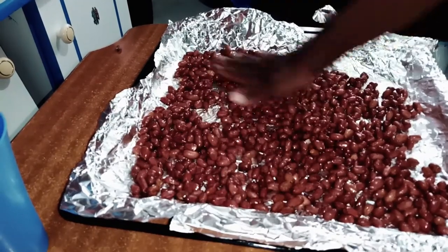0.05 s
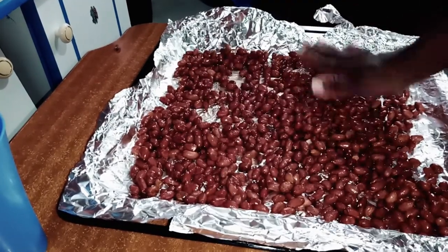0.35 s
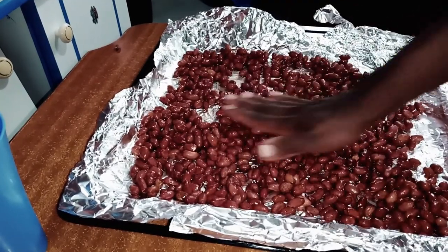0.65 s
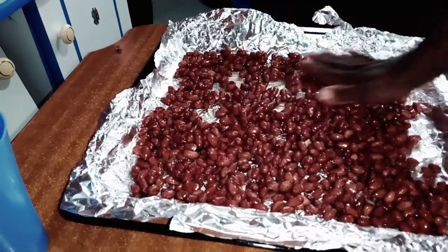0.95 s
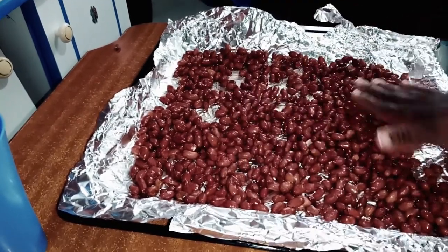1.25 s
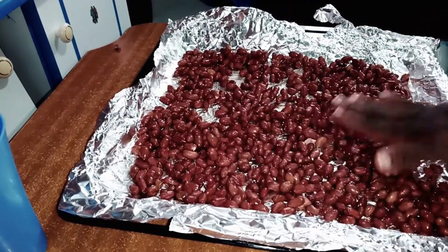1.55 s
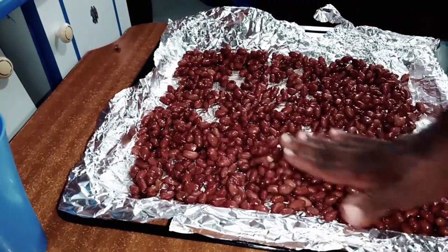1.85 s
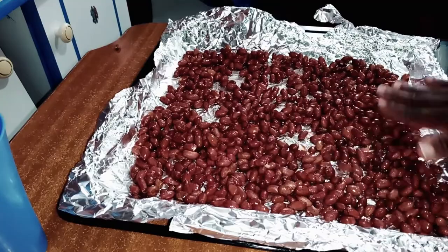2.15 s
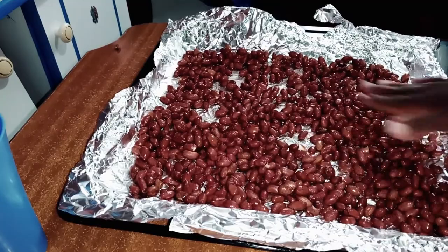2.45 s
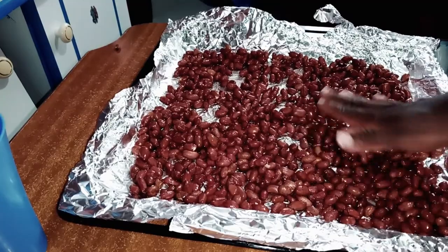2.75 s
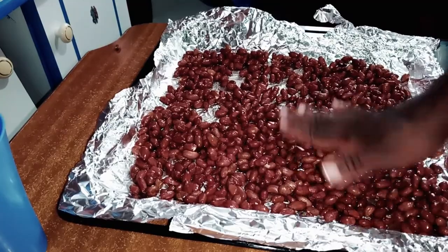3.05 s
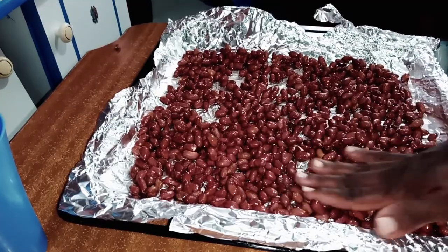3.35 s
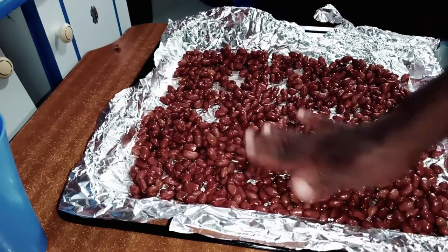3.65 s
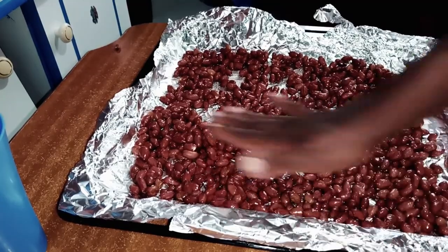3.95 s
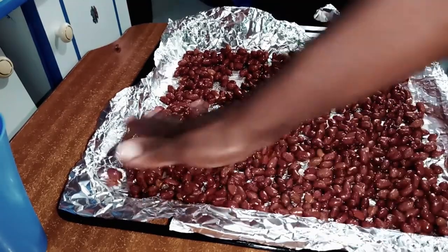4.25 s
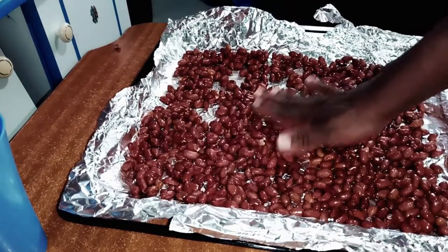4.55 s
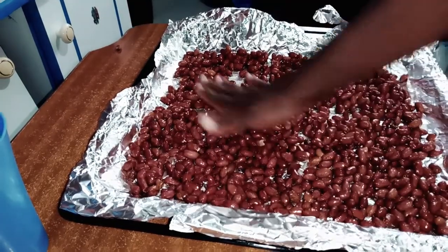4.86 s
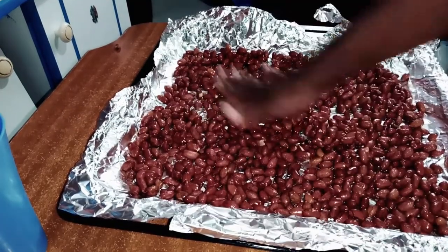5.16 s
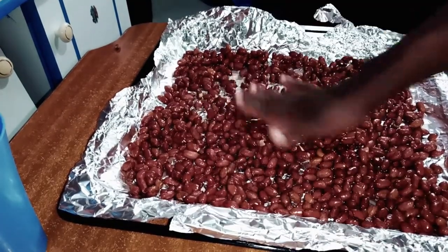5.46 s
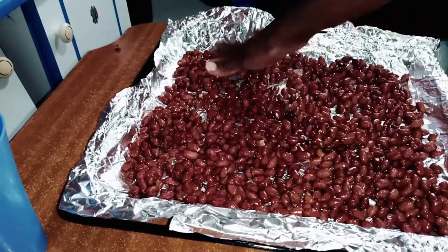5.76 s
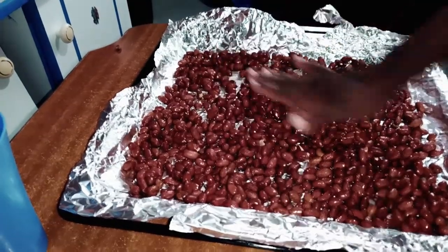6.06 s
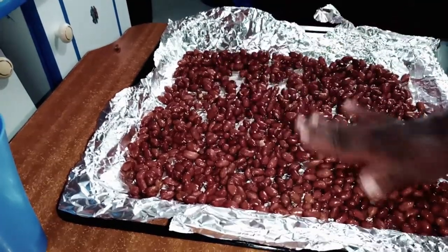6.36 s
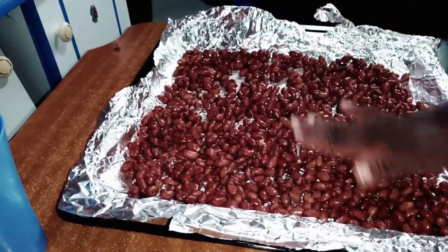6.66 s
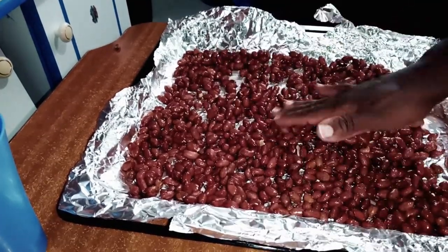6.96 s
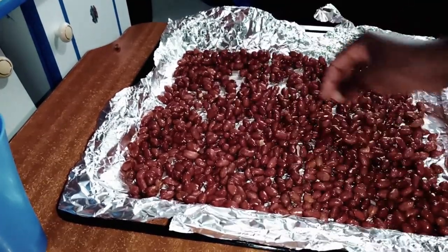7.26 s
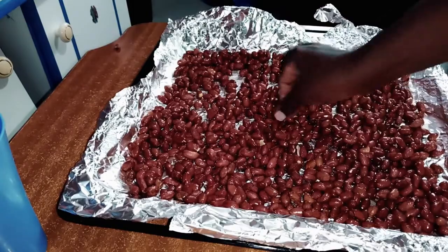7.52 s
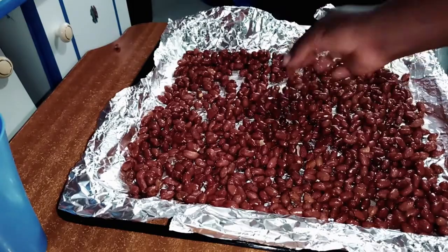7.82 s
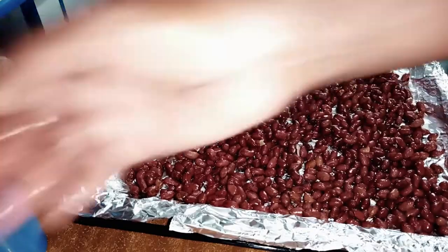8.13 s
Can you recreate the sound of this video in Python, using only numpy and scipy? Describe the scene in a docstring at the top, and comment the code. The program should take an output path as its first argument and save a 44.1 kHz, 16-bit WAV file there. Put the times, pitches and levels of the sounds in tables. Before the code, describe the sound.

Close, repeated rustles of foil and clattering nuts as a hand spreads them over a baking tray in a quiet kitchen.

```python
"""Spreading peanuts on foil

A small kitchen, one microphone close to a foil-lined baking tray. A hand pats and spreads raw peanuts.
Each stroke swells, slides and lets go in a shower of tiny contacts: the foil crinkles, nuts click
together, the tray rumbles under them and flexes under the palm. Single creases snap and single nuts
knock on the tray. Behind it are faint hisses, still air and a low, wavering hum."""
import sys
import numpy as np
from scipy import signal
from scipy.fft import rfft, irfft
from scipy.io import wavfile
from scipy.ndimage import uniform_filter1d

SR = 44100
rng = np.random.default_rng(int(sys.argv[2]) if len(sys.argv) > 2 else 0)


def digitize_waveform(pressure):
    """Quantize a signal to 16-bit integers and store it at the path in sys.argv[1].

    Rows of a 2-D input are taken as channels; values are limited to [-1, 1].
    """
    field = np.atleast_2d(pressure).T
    bounded = np.clip(field, -1, 1)
    quanta = np.round(bounded * 32767).astype(np.int16)
    wavfile.write(sys.argv[1], SR, quanta)


N = 361179


def from_db(db):
    """Decibels to gain."""
    return 10 ** (np.asarray(db) / 20)


def rms_one(x):
    """Scale to rms 1."""
    return x / np.sqrt(np.mean(x ** 2) + 1e-20)


def in_time(rows):
    """Each column of a curve at every sample."""
    times, *columns = np.transpose(rows)
    return [np.interp(np.arange(N) / SR, times, column) for column in columns]


def add(out, start_s, sound):
    """Mix a short sound in at start_s."""
    at = int(np.clip(start_s * SR, 0, N - 1))
    out[at:at + len(sound)] += sound[:N - at]


def convolve(x, response):
    """Pass x through an impulse response."""
    return signal.oaconvolve(x, response)[:len(x)]


def response_of(spectrum, size=4096):
    """The causal (minimum-phase) impulse response that has this spectrum; energy 1."""
    hz, db = np.transpose(spectrum)
    grid_hz = np.maximum(np.fft.rfftfreq(size, 1 / SR), 1)
    gain = from_db(np.interp(np.log(grid_hz), np.log(hz), db))
    cepstrum = irfft(np.log(gain))
    cepstrum[1:size // 2] *= 2
    cepstrum[size // 2 + 1:] = 0
    return rms_one(irfft(np.exp(rfft(cepstrum)))) / np.sqrt(size)


def burst(t60, size=4096):
    """Noise that dies away by 60 dB in t60 seconds; energy 1."""
    decay = from_db(-60 * np.arange(size) / SR / t60)
    return rms_one(rng.standard_normal(size) * decay) / np.sqrt(size)


def band(x, hz, ratio):
    """Band-pass from hz / ratio to hz * ratio."""
    edges = [hz / ratio, hz * ratio]
    return signal.sosfilt(signal.butter(2, edges, "band", fs=SR, output="sos"), x)


def drift(per_s):
    """A random wander with per_s turning points a second; rms 1."""
    knots = rng.standard_normal(N // 20)
    return rms_one(np.interp(np.arange(N) / SR * per_s, np.arange(len(knots)), knots))


def brighten(x, pivot_hz, bright_db):
    """Raise or lower everything above the pivot."""
    low = signal.sosfiltfilt(signal.butter(3, pivot_hz, fs=SR, output="sos"), x)
    return low + from_db(bright_db) * (x - low)


def steady(x):
    """Hold the level at 1, leaving the fine grain."""
    x = rms_one(x)
    power = uniform_filter1d(uniform_filter1d(x ** 2, size=900), size=600)
    return x / np.sqrt(np.maximum(power, 1e-9))


# Room tone of the kitchen: frequency_hz, density_db
AIR_SPECTRUM = [(25, -7.5), (65, 4), (130, -7), (260, -11.5), (430, -19), (900, -21.5), (3300, -25),
                (5200, -24), (6400, -19), (8600, -35), (13500, -29.5), (15000, -25), (16000, -34.5)]


def still_air(level_db=-73):
    """Steady, soft noise all around the microphone, strongest in the bass."""
    return from_db(level_db) * rms_one(convolve(rng.standard_normal(N), response_of(AIR_SPECTRUM)))


# Course of the hum in the background: time_s, pitch_hz, relative_level_db
HUM_CURVE = [(0.0, 71, -73), (0.04, 69.4, -66), (0.41, 66.7, -65.5), (0.7, 67, -77), (1.03, 77.6, -60),
             (1.3, 79.0, -84), (1.43, 82, -58), (1.64, 81.3, -72), (1.78, 67.65, -77), (1.87, 63.1, -58),
             (2.0, 58.45, -69), (3.17, 76.7, -63.5), (3.37, 76.8, -79), (3.49, 81.6, -65.5),
             (3.9, 85.7, -68.5), (4.22, 69.55, -62), (5.31, 69.69, -67), (5.7, 52.5, -65),
             (6.09, 62.25, -82.5), (6.34, 62.7, -73), (6.61, 57.8, -67), (6.93, 62.8, -78.5),
             (7.25, 60.4, -73), (7.53, 66.5, -80.5), (8.1, 66.3, -68), (8.19, 64.9, -61.5)]


def hum(waver_hz=4.0, waver_db=3.0, trim_db=-0.9):
    """A low tone that wavers in pitch and strength."""
    hz, db = in_time(HUM_CURVE)
    phase = 2 * np.pi * np.cumsum(hz + waver_hz * drift(40)) / SR
    return from_db(db + trim_db + waver_db * drift(16)) * rms_one(np.sin(phase))


# Thin hisses between strokes: centre_s, length_s, pitch_hz, level_db
HISSES = [(4.275, 0.029, 5600, -54), (4.608, .025, 4500, -57), (6.05, .04, 5140, -68),
          (7.172, 0.13, 4910, -71), (7.386, .09, 6410, -68), (7.992, 0.079, 6030, -69.5)]


def hisses(flutter_db=2.5):
    """Faint, narrow bands of noise swell, flutter and fade."""
    out = np.zeros(N)
    for centre_s, length_s, hz, db in HISSES:
        swell = np.hanning(int(length_s * SR))
        hiss = rms_one(band(rng.standard_normal(SR), hz, ratio=1.106))[-len(swell):]
        gain = from_db(db + flutter_db * drift(150)[:len(swell)])
        add(out, centre_s - length_s / 2, gain * swell * hiss)
    return out


# The tray flexing: start_s, pitch_hz, level_db (before the rise softens the peak)
THUDS = [(0.163, 241.6, -42.5), (.315, 134.1, -51), (0.783, 242.2, -45.5), (0.932, 152.9, -47),
         (1.0, 150, -49), (1.61, 159.7, -58), (2.82, 124.6, -56.5), (5.18, 249.6, -57),
         (5.77, 249.5, -51.5)]


def tray_thuds(t60=0.28, rise_s=0.008):
    """The tray bottom gives under the palm with a soft, low ring."""
    out, t = np.zeros(N), np.arange(SR // 2) / SR
    rise = 1 - np.exp(-t / rise_s)
    for start_s, hz, db in THUDS:
        add(out, start_s, from_db(db - 60 * t / t60) * rise * np.sin(2 * np.pi * hz * t))
    return out


def hit(t60):
    """A sharp contact followed by a short shiver of the sheet."""
    pulse = burst(t60)
    pulse[0] += 1
    return pulse


# Ring of the tray struck by a nut: frequency_hz, density_db
KNOCK_SPECTRUM = [(200, -26), (700, -14.5), (1200, -12.5), (1560, -4.5), (1830, -9.5), (2120, -5),
                  (2550, -11), (2900, -4.5), (3800, -19.5), (6500, -26), (9000, -70)]
# The loudest single nuts on the tray: start_s, peak_db, pitch_hz
KNOCKS = [(0.0054, -36, 2620), (0.186, -28, 2180), (0.2646, -26.5, 1920), (0.5787, -33, 1440),
          (0.7516, -34.5, 2040), (0.833, -30, 1960), (0.9515, -24.5, 2900), (1.0008, -32, 2190),
          (1.0505, -35.5, 2020), (1.3229, -44, 1660), (1.3628, -45, 1557), (1.5229, -32, 1571),
          (1.5448, -30, 1781), (2.2542, -37.5, 2240), (2.6, -38, 1696), (2.6415, -26, 1667),
          (2.8693, -34, 1777), (3.016, -31, 1679), (3.7914, -39, 1670), (4.351, -38.5, 1570),
          (4.6464, -29.5, 1656), (5.7689, -32.5, 2069), (5.8197, -40.5, 1300), (5.9692, -39.5, 2356),
          (6.1893, -35, 1550), (6.2031, -34, 1660), (6.3205, -32, 1570), (6.54, -35.5, 1301),
          (7.675, -68, 1510)]


def nut_knocks():
    """A nut drops on the loaded tray, which damps the ring at once; each spot favours its own pitch."""
    out, tone = np.zeros(N), response_of(KNOCK_SPECTRUM)
    for start_s, db, hz in KNOCKS:
        knock = band(convolve(hit(t60=0.025), tone), hz, ratio=1.42)
        add(out, start_s, from_db(db) * knock / np.abs(knock).max())
    return out


# Click of a foil crease, brightened by the microphone's treble peaks: frequency_hz, density_db
SNAP_SPECTRUM = [(1000, -27.5), (3000, -13.5), (5000, -2.5), (6300, 8), (7100, 6.5), (8400, -13),
                 (13000, -14), (15000, -11.5), (16500, -15.5)]
# The loudest creases: start_s, peak_db
SNAPS = [(0.0692, -27.5), (0.1244, -24), (0.3011, -23), (0.5045, -28), (0.5616, -30), (0.6487, -33),
         (0.9444, -23), (1.0672, -30.5), (1.1607, -30), (1.4053, -24.5), (1.4157, -27), (1.4553, -23.5),
         (1.775, -17), (1.8009, -18.5), (1.936, -20.5), (2.16, -31.5), (2.8825, -24.5), (2.9071, -21.5),
         (3.0255, -32), (3.2116, -23.5), (3.2854, -28.5), (3.3445, -35), (3.5876, -29.5), (3.6154, -22.5),
         (3.6204, -21), (3.68, -28.5), (3.7146, -35), (3.7646, -33.5), (3.7799, -28.5), (3.8402, -27.5),
         (4.0891, -11.5), (4.0926, -17), (4.0981, -22), (4.1094, -25), (4.1624, -31), (4.22, -36.5),
         (4.4483, -36), (4.498, -25.5), (4.5293, -28.5), (4.786, -34), (5.005, -29.5), (5.1667, -29),
         (5.179, -24.5), (5.2257, -29), (5.3196, -38), (5.4325, -26.5), (5.4605, -26), (6.223, -30.5),
         (6.343, -33), (6.3901, -28.5), (6.4678, -31.5), (6.5121, -30), (6.9174, -39), (7.0249, -40),
         (7.6335, -44)]


def crease_snaps(foil_gain, small_per_s=16, small_above_foil_db=13):
    """A crease flips with one bright click; small ones flip at random, as hard as the foil is stirred."""
    out, tone = np.zeros(N), response_of(SNAP_SPECTRUM)
    flips = np.flatnonzero(rng.random(N) < small_per_s / SR)
    small = [(at / SR, 20 * np.log10(foil_gain[at]) + small_above_foil_db) for at in flips]
    for start_s, db in list(SNAPS) + small:
        click = convolve(hit(t60=0.009), tone)
        add(out, start_s, from_db(db) * click / np.abs(click).max())
    return out


# Fall in level as the hand lifts: foil_db_per_s, nuts_db_per_s, tray_db_per_s
RELEASE_RATES = [249.5, 284, 196]
# Firm sweeps and light brushes of the hand, coloured by where it lands; levels are relative:
# start_s, swell_s, slide_s, sag_db, foil_db, nuts_db, tray_db,
# foil_bright_db, nuts_bright_db, tray_bright_db
STROKES = [(0.0, 0.0058, 0.0018, 6.0, -41, -44.5, -51.5, -10, -5, 4.0),
           (0.068, 0.0094, 0.13, -5.0, -42.0, -48.5, -59, -5.0, 6, 4.5),
           (0.184, 0.004, 0.125, 6.0, -37.5, -39, -52.0, -5.5, 7, 3),
           (0.471, 0.032, 0.15, 3, -44.0, -52.5, -64.0, -1, 3, 5.5),
           (0.67, 0.018, 0.061, 0.0, -53.0, -59.5, -71.5, 3, 5, 0.0),
           (0.751, 0.057, 0.1877, 1.0, -41.0, -44.0, -52.5, -3.5, 3, 5.5),
           (1.035, 0.026, 0.17, 5.0, -44.0, -51.0, -55.0, -2.5, 1, -2),
           (1.358, 0.051, 0.14, 3.5, -46.0, -51.5, -57.0, 0, 0, 1.5),
           (1.753, 0.03, 0.11, 10.0, -40.0, -46.5, -51.5, 0, -5, -1.5),
           (1.92, 0.013, 0.2, 5.0, -44.0, -53.5, -58, 0.5, -2, -1.5),
           (2.2, 0.01, 0.028, 7, -58.0, -72, -76.0, 0.0, -4, 0.0),
           (2.244, 0.041, 0.038, 2.5, -43.0, -53.5, -66, -2, -3, 4.0),
           (2.43, 0.02, 0.03, 4.0, -67.0, -73.0, -73.5, -9, 3.5, -5),
           (2.518, 0.087, 0.051, 2.0, -44.5, -52, -58.5, 3, 3, 4),
           (2.8, 0.04, 0.02, -2, -64.0, -81, -75.0, -3.0, 2, -11),
           (2.864, 0.021, 0.043, 3.5, -40.0, -49, -56.5, -5, 0, 5.5),
           (3.024, 0.004, 0.018, 8.0, -51.0, -57.5, -63.5, 7, -6, 1.0),
           (3.122, 0.026, 0.07, 9.0, -40.0, -46.5, -49.5, 0.5, -4.5, 10.5),
           (3.28, 0.03, 0.022, 3.0, -41.0, -52.5, -58, -1, 2.0, 9.5),
           (3.4, 0.015, 0.067, 9.5, -57.0, -71, -62, -11, -5, 1),
           (3.579, 0.038, 0.09, 13.0, -42.0, -53.5, -60, -2.0, -3.5, -2),
           (3.763, 0.012, 0.101, 16.0, -47.0, -58.5, -61.5, 2, 0, 1),
           (4.085, 0.005, 0.048, 13.0, -30.0, -41, -48.5, -7, 2.5, 4.0),
           (4.146, 0.023, 0.074, 15.0, -49.0, -57, -56.0, -8, 0, 6.5),
           (4.342, 0.0039, 0.163, -5.0, -49.0, -57.5, -65, -1.0, 1, 4.5),
           (4.68, 0.025, 0.095, 0.0, -49.0, -59.5, -68.0, -0.5, 4, -2),
           (4.889, 0.0281, 0.09, 1.0, -50.5, -63, -74.5, -7, 3, -2),
           (5.055, 0.0078, 0.02, 6.0, -59, -82.5, -81.0, -5, 4, 2),
           (5.13, 0.0054, 0.022, 0, -57, -71, -71, 0, -2, 8),
           (5.16, 0.0061, 0.061, 5.5, -42, -51.5, -58.0, 1, 4, 8),
           (5.345, 0.0073, 0.015, 5.0, -59.0, -80, -72, -4.0, 0.0, 7),
           (5.394, 0.03, 0.11, 5.5, -45.5, -55.0, -60.0, -3, 0, 0.5),
           (5.703, 0.0081, 0.048, 3.0, -70, -87, -86.0, -6, 0.0, -4),
           (5.763, 0.0054, 0.073, 16.0, -45.0, -48, -50, -12, -0.0, 3.0),
           (5.967, 0.003, 0.019, 15.0, -50.5, -55.5, -62, -12, -4, 18),
           (6.188, 0.002, 0.033, 3.5, -43.0, -51, -59, -3.0, -2.5, 5),
           (6.319, 0.0086, 0.054, 3.5, -42.5, -52, -56.5, -5, -7, 12),
           (6.43, 0.01, 0.05, 2.0, -56, -66.5, -90, 1, -6.0, 6),
           (6.498, 0.049, 0.044, 17, -42, -53.5, -64.5, -2.5, -4, 12),
           (6.63, 0.0096, 0.0062, 2.0, -63, -75.0, -81, -8, -8, 6.0),
           (6.88, 0.013, 0.045, 2.0, -53.5, -65.5, -84, -1, 6, -5),
           (7.022, 0.0044, 0.0061, 11.0, -53, -64.0, -75, -9.0, 0, 0.0),
           (7.496, 0.023, 0.087, -1.5, -58.5, -72.0, -80.5, -5.5, 14, -12),
           (7.66, 0.011, 0.028, 4.5, -71, -78.5, -85, -6.5, -3.0, -1)]


def stroke_gains(first_touch_db=-11, settle_db=-18, settle_db_per_s=92, waver_db=1.54):
    """Gains of foil, nuts and tray: the hand presses, slides and lifts, and the heap goes on settling."""
    t, power = np.arange(0, N, 20) / SR, 1e-14
    for start_s, swell_s, slide_s, sag_db, *levels_db in np.array(STROKES)[:, :7]:
        age = t - start_s
        swell_left = np.clip(1 - age / swell_s, 0, 1)
        slide_done = np.clip((age - swell_s) / slide_s, 0, 1)
        pressure_db = first_touch_db * swell_left - sag_db * slide_done
        pressed = (age >= 0) * from_db(np.c_[levels_db] + pressure_db)
        lifted_s = np.maximum(age - swell_s - slide_s, 0)
        release = from_db(-np.outer(RELEASE_RATES, lifted_s))
        settling = from_db(settle_db - settle_db_per_s * lifted_s)
        power = power + (pressed * np.maximum(release, settling)) ** 2
    gains = np.array(in_time(np.c_[t, np.sqrt(power).T]))
    gains = uniform_filter1d(gains, size=130)   # the soft palm takes a few milliseconds to press home
    return gains * from_db(waver_db * drift(40))


def stroke_brightness():
    """Brightness of foil, nuts and tray in dB, held from one stroke to the next."""
    rows = np.array(STROKES)
    latest = np.maximum(np.searchsorted(rows[:, 0], np.arange(N) / SR) - 1, 0)
    return rows[latest, -3:].T


def contacts(per_s, clump_db, spread_db):
    """Random touches that come in clumps; a few are much harder than the rest."""
    touching = rng.random(N) < per_s * from_db(clump_db * drift(90)) / SR
    return touching * from_db(spread_db * np.minimum(rng.exponential(1, N), 4))


def shiver(touches, t60, rub):
    """Every touch starts a noisy shiver that dies away, over a little sliding friction; rms 1."""
    decay = from_db(-120 / (t60 * SR))
    power = signal.lfilter([1], [1, -decay], touches ** 2 + 1e-18)
    return rms_one(np.sqrt(power / power.mean() + rub ** 2) * rng.standard_normal(N))


def rattle(touches, spectrum, t60, vary_db, rub, bands):
    """Every touch rings the bands of a part with strengths of its own, so each has its own pitch."""
    centres = np.geomspace(spectrum[0][0], spectrum[-1][0], bands)
    at, rings = np.flatnonzero(touches), np.zeros(N)
    for hz in centres:
        strengths = np.zeros(N)
        strengths[at] = touches[at] * from_db(vary_db * np.clip(rng.standard_normal(len(at)), -2, 2))
        rings += band(shiver(strengths, t60, rub), hz, ratio=np.sqrt(centres[1] / centres[0]))
    return convolve(rings, response_of(spectrum))


# Crinkle of foil, clatter of nuts and rumble of tray, as coloured by the microphone:
# frequency_hz, density_db
FOIL_SPECTRUM = [(2100, -39), (3500, -15.5), (4400, -7.5), (5600, -3), (6450, 6), (7000, 2), (8200, -11),
                 (10000, -16.5), (13500, -21), (14700, -13.5), (15700, -10), (16400, -30)]
NUTS_SPECTRUM = [(400, -46.5), (800, -18.5), (1150, -6.5), (1600, -2.5), (2150, -5), (2500, -6),
                 (3200, -5.5), (3900, -7.5), (4600, -10), (6000, -34)]
TRAY_SPECTRUM = [(60, -37.5), (120, -6.5), (190, -5), (250, 0.5), (330, -4.5), (490, -4.5), (620, -7.5),
                 (800, -8.5), (1100, -11), (1800, -41)]


def spreading(foil_gain, nuts_gain, tray_gain, middling_per_s=950, middling_db=-45):
    """A brisker stroke makes more contacts; the same contacts excite foil, nuts and tray."""
    foil_bright, nuts_bright, tray_bright = stroke_brightness()
    per_s = middling_per_s * (foil_gain / from_db(middling_db)) ** 0.15
    touches = contacts(per_s, clump_db=2.5, spread_db=3.5)
    crinkle = rattle(touches, FOIL_SPECTRUM, t60=0.023, vary_db=8.0, rub=0.46, bands=9)
    clatter = rattle(touches, NUTS_SPECTRUM, t60=0.03, vary_db=8.0, rub=0.12, bands=14)
    rumble = rattle(touches, TRAY_SPECTRUM, t60=0.031, vary_db=10.5, rub=0.31, bands=13)
    return (from_db(-0.5) * foil_gain * steady(brighten(crinkle, 8570, foil_bright))
            + from_db(0.66) * nuts_gain * steady(brighten(clatter, 2300, nuts_bright))
            + from_db(-0.5) * tray_gain * steady(brighten(rumble, 330.23, tray_bright)))


def kitchen(direct, near_db, near_t60, far_db, far_t60, wall_hz):
    """Quick reflections from table and cupboards reach the microphone, then a short, duller tail."""
    near = convolve(direct, np.pad(burst(near_t60), (60, 0)))
    far = convolve(direct, np.pad(burst(far_t60, size=32768), (400, 0)))
    walls = signal.butter(2, wall_hz, fs=SR, output="sos")
    return direct + from_db(near_db) * near + from_db(far_db) * signal.sosfilt(walls, far)


def scene():
    """The tray close by in the kitchen, over hum and still air; mono."""
    foil_gain, nuts_gain, tray_gain = stroke_gains()
    direct = spreading(foil_gain, nuts_gain, tray_gain)
    direct += nut_knocks() + tray_thuds() + hisses() + crease_snaps(foil_gain)
    air = still_air()
    heard = kitchen(direct, near_db=-12.0, near_t60=0.056, far_db=-14.5, far_t60=0.31, wall_hz=8000)
    return (heard + hum() + air)[None]


def record(dry):
    """A steep low-pass cuts the top of the microphone's signal."""
    cutoff_hz = 16200
    return signal.sosfilt(signal.ellip(10, 0.3, 70, cutoff_hz, fs=SR, output="sos"), dry)


dry = scene()
out = record(dry)
digitize_waveform(out)
```